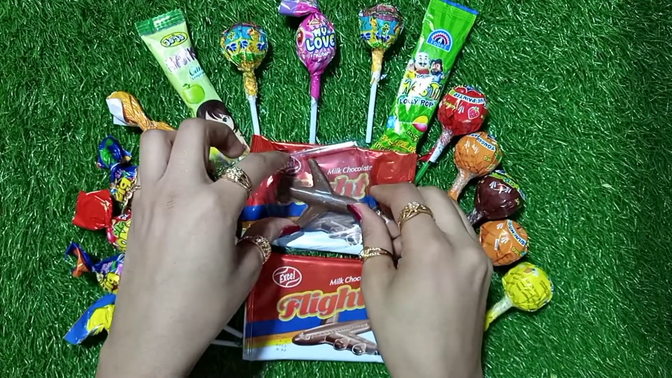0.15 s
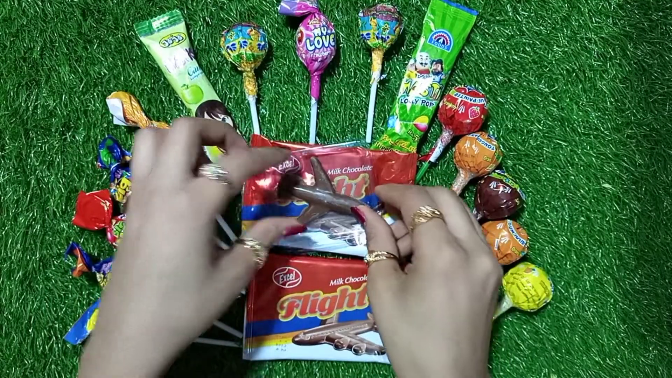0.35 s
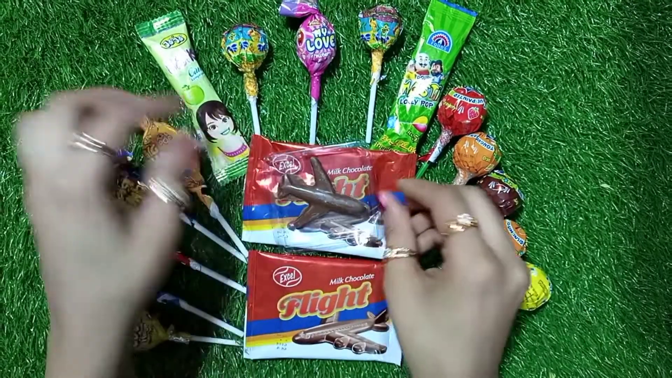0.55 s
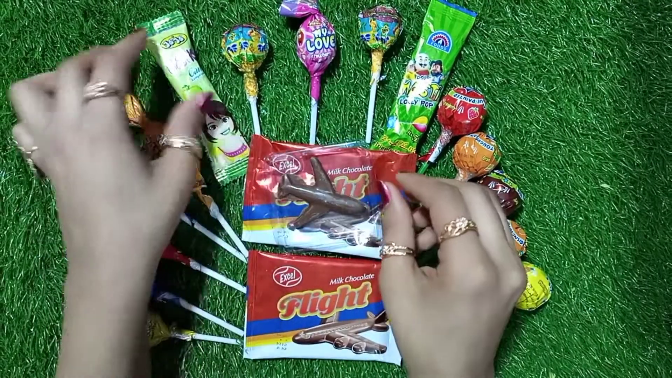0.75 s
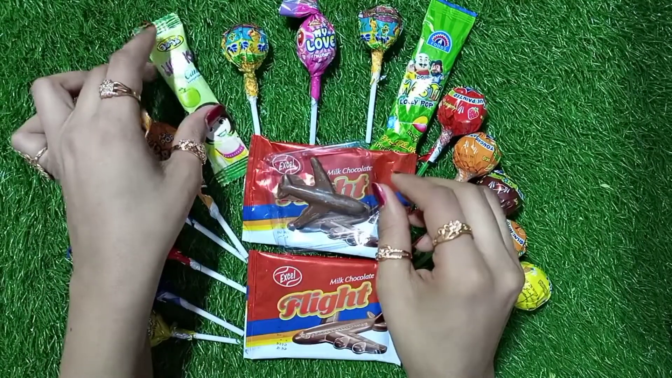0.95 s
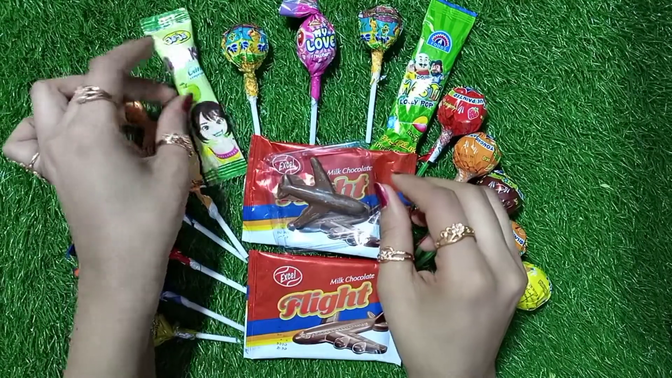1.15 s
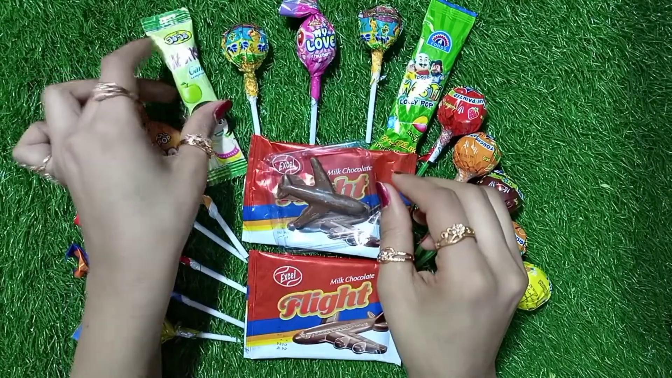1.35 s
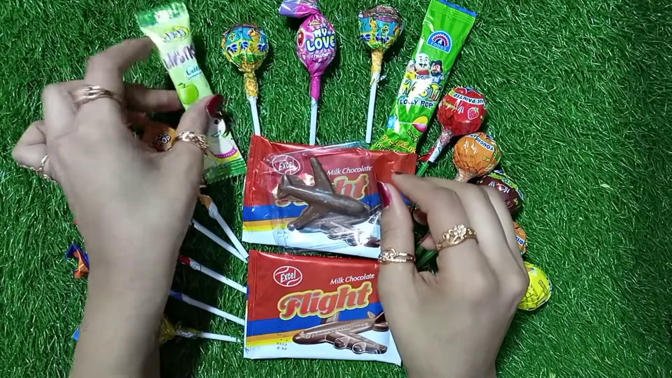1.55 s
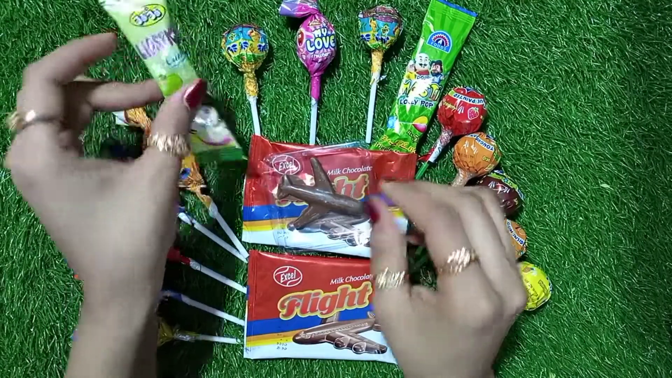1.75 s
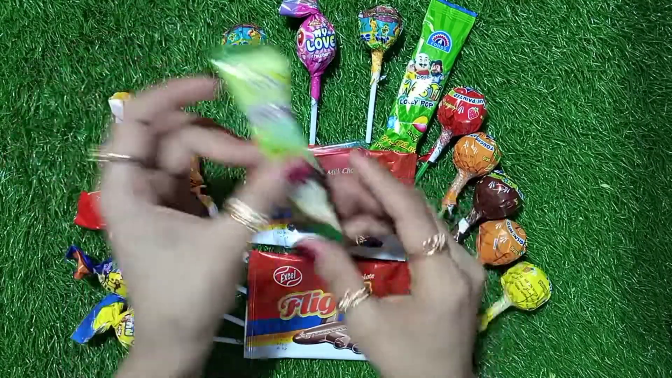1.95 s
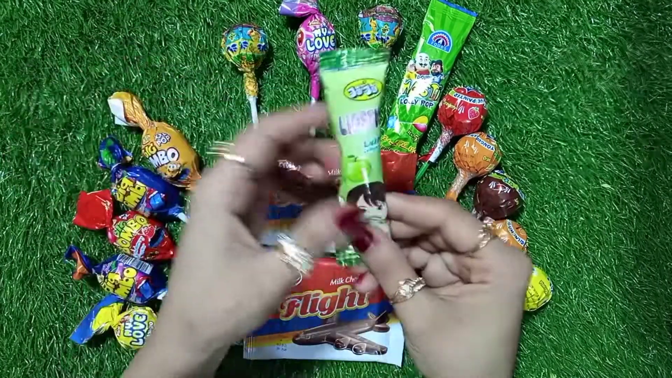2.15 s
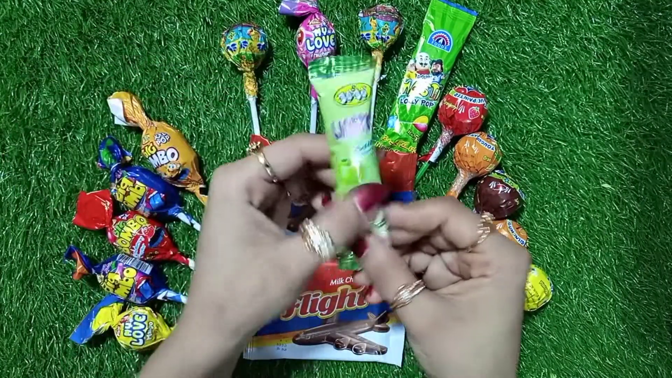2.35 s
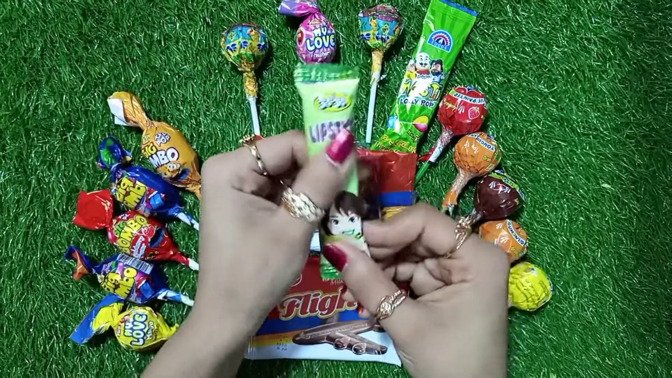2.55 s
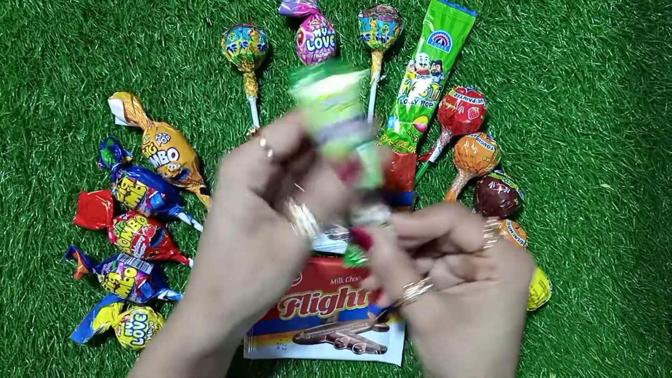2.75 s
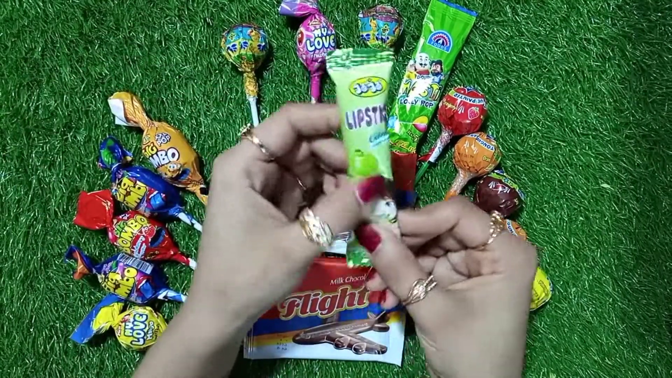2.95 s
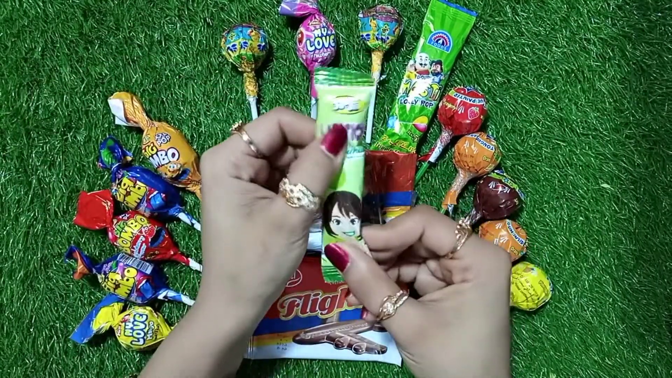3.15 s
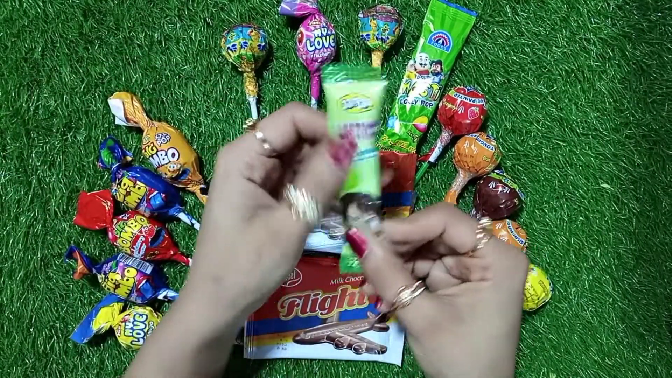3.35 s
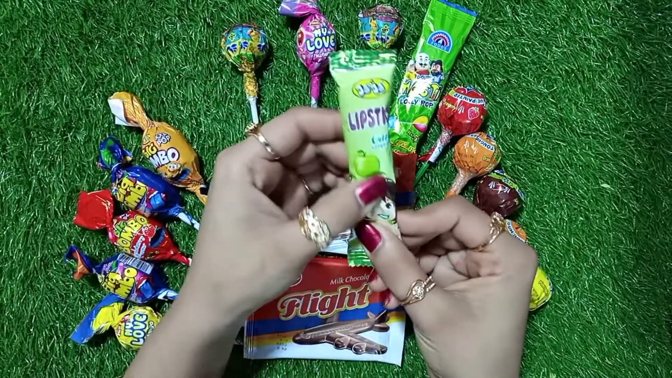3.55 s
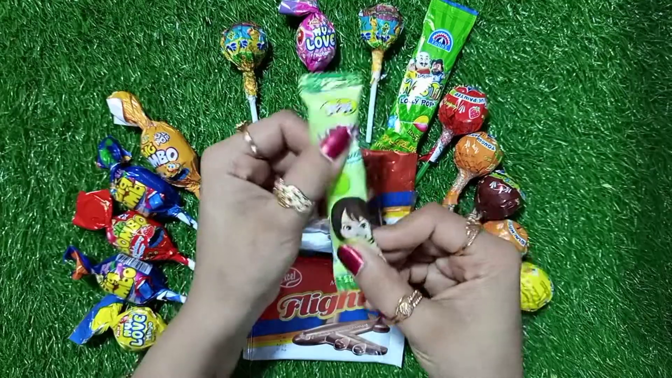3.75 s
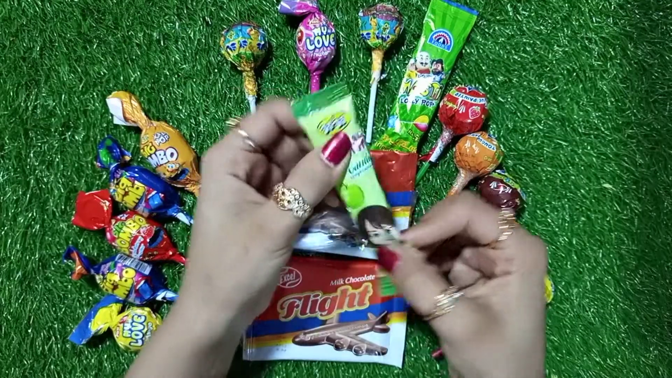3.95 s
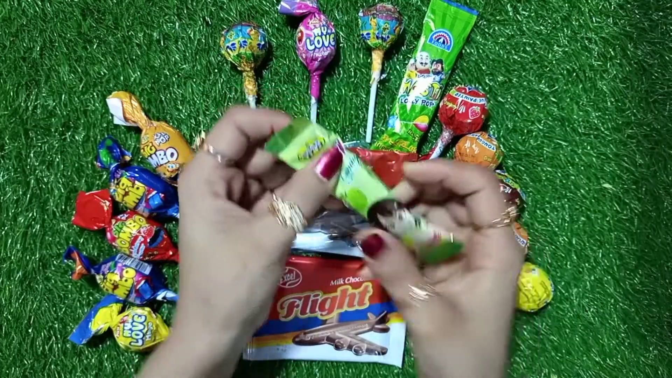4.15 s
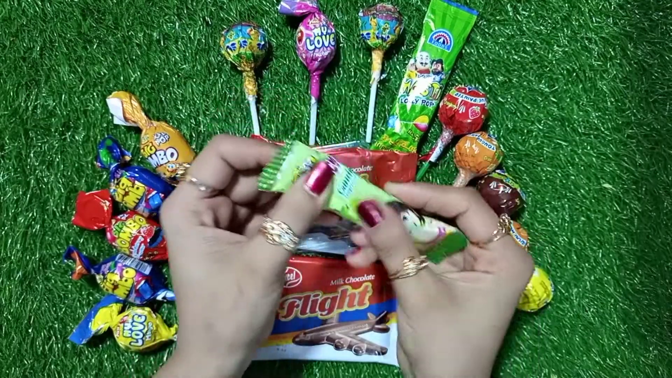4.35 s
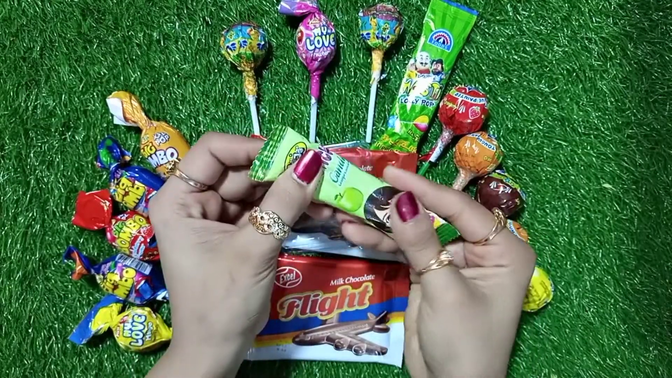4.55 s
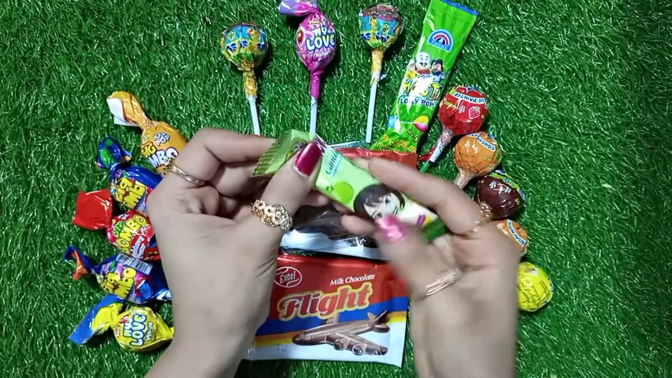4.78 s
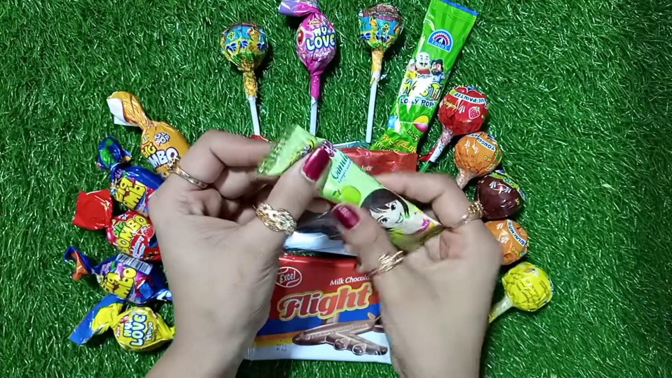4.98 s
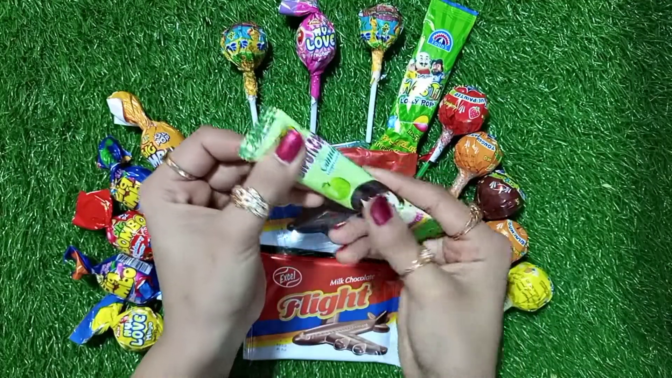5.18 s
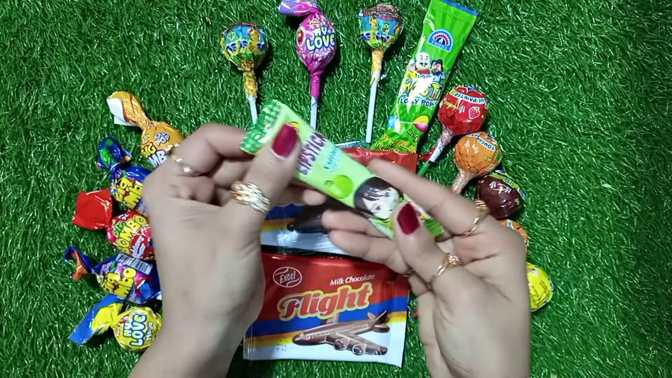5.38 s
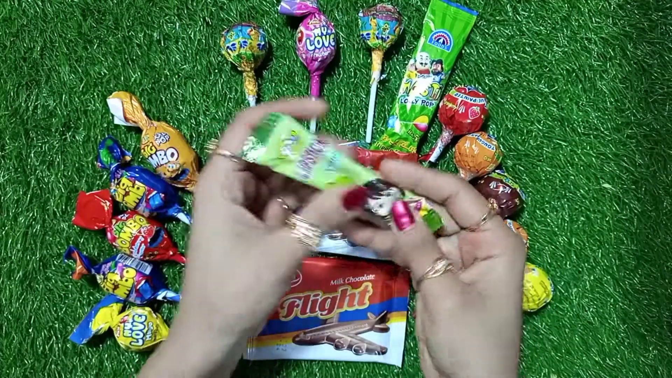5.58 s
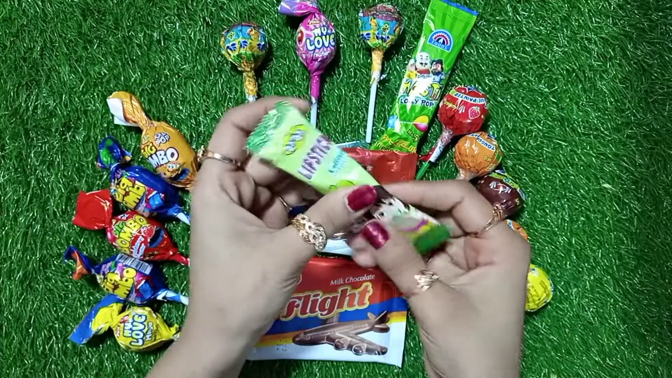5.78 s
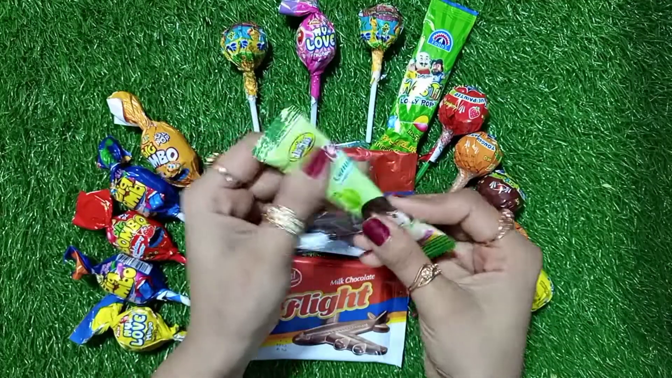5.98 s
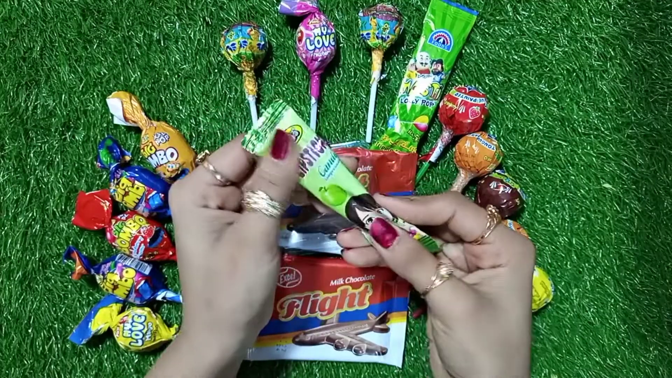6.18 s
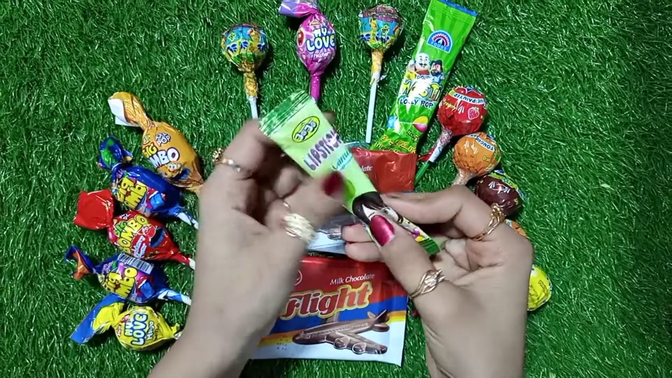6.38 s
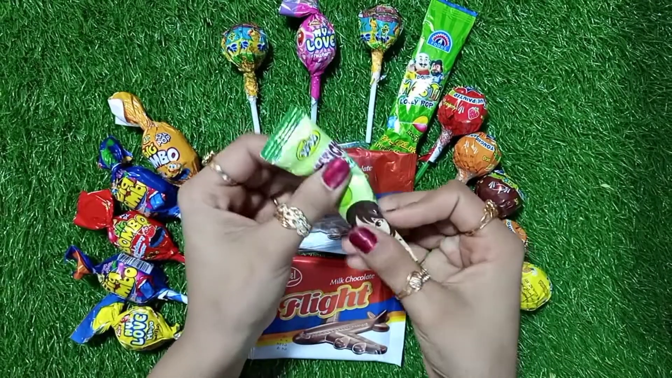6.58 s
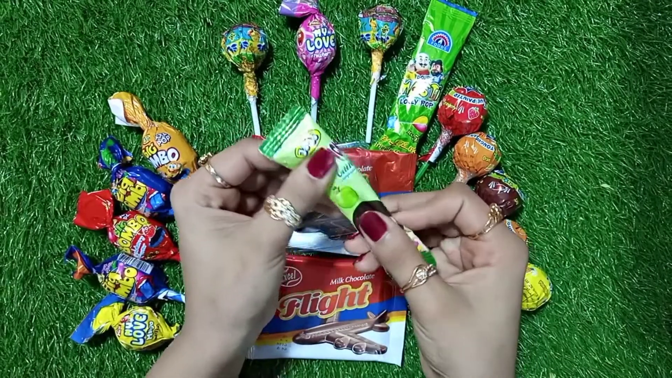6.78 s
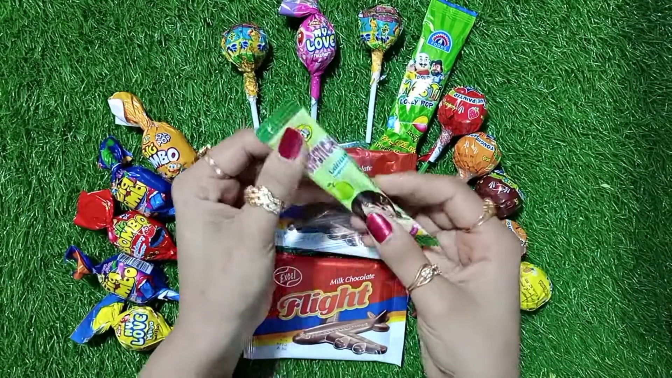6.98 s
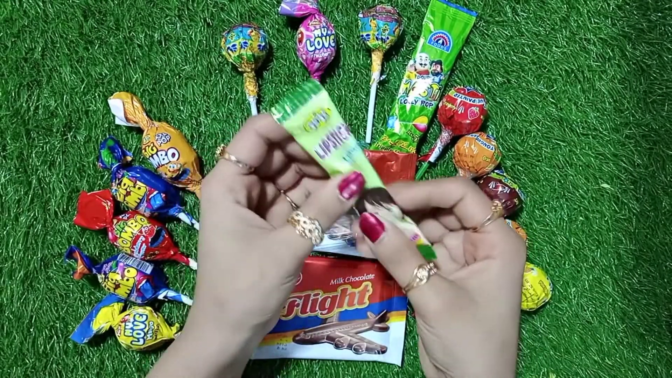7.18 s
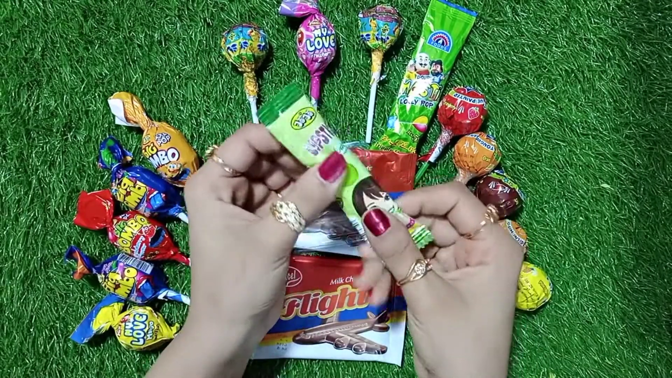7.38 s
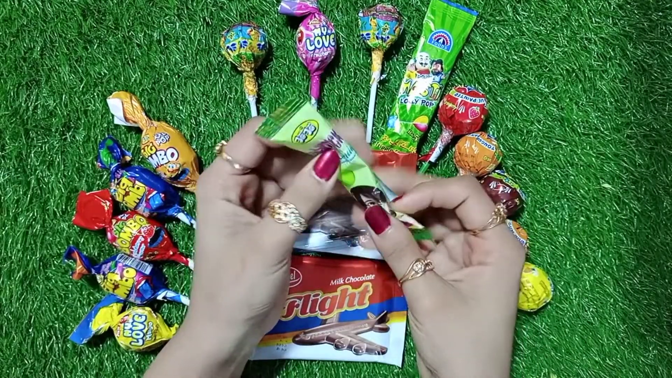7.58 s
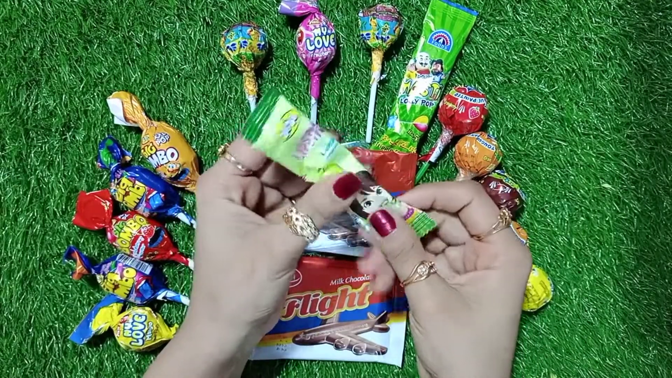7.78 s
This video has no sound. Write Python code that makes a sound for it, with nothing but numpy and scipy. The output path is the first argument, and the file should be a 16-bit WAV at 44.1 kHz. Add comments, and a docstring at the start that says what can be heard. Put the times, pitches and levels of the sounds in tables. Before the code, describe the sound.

Fingers squeeze and twist a small stiff plastic candy sleeve up close, first faintly, then in dense bright crackles and sharp snaps.

```python
"""Two hands work at a sweet in a stiff plastic sleeve, close to the microphone, and a small room answers.
Creases buckle in loud snaps: each flip is a short, dispersed ring at the pitch of its own facet.
Squeezes drive fine crackle from the same rings and a noise rub; the bent film later ticks as it settles.
Hollow flexes and faint squeaks are gliding or rough sines. The table shudders with a low tone and rumble
while the hand reaches over; later something hoots faintly far off, over still air and microphone hiss."""
import sys
import numpy as np
from scipy import signal
from scipy.fft import rfft, irfft, next_fast_len
from scipy.io import wavfile
from scipy.ndimage import uniform_filter1d, map_coordinates

SR = 44100
rng = np.random.default_rng(int(sys.argv[2]) if len(sys.argv) > 2 else 0)


def pcm_store(signal):
    """Save signal as 16-bit PCM."""
    levels = np.round(np.clip(np.atleast_2d(signal), -1, 1) * 32767)
    wavfile.write(sys.argv[1], SR, levels.astype(np.int16).T)


N = 345303

# the loudest creases buckling: start_s, level_db (rms over 4 ms, before the trims in snaps), pitch_hz of the
# facet, body_db of the packet and edge_db of its sharp top (both before the offsets in buckles)
CREASES = [(0.2748, -46, 2170, 8.5, 0), (0.4262, -52.5, 2850, 1, 21.5), (0.914, -50, 3630, 4, -9),
           (1.1306, -44, 2180, -3, -2), (1.143, -44.5, 2220, 5, 3), (1.4855, -42, 3340, 0, -7),
           (1.521, -44.5, 3180, 7, 9.5), (1.6267, -43, 3880, 1, 2), (1.8547, -44.5, 3750, 0, 3),
           (1.972, -47.5, 2960, -46, -12), (2.153, -36.5, 3420, 13, 3), (2.1788, -35.5, 2560, 12.5, 0),
           (2.3143, -36.5, 3070, -6, 1), (2.4426, -30.5, 3430, -1, 2), (2.5647, -33.5, 2740, 4, 7.5),
           (2.6347, -27, 4000, -4, 4.5), (2.6523, -31.5, 2810, -18, -9), (2.8607, -32.5, 3550, 5, -6),
           (2.9466, -34, 3040, 9, -20), (3.0824, -35.5, 2880, 4, -6), (3.1629, -34.5, 3460, 4.5, 4),
           (3.2021, -35, 3930, -13, -2), (3.2303, -32, 2950, -24, -14), (3.3203, -29, 3080, -1, 7.5),
           (3.3328, -26.5, 3900, -16, -8), (3.4387, -27.5, 3300, -2.5, -7), (3.4731, -33, 3100, -3, -30),
           (3.6529, -36.5, 4400, 5.5, 6.5), (3.829, -36.5, 3060, 0, -10), (3.9397, -36, 3320, -14, 1),
           (3.9901, -26, 3670, -2, 3), (4.076, -29.5, 3570, -8.5, 5), (4.208, -38, 3470, -1, 2),
           (4.2577, -33, 3580, -10, -4), (4.311, -33.5, 3430, -5, -25), (4.3884, -30, 3280, -6, 2),
           (4.4413, -30.5, 2480, -11, 3), (4.4668, -29, 4550, -30, 4), (4.5571, -30.5, 2780, -13, 3.5),
           (4.6353, -27.5, 2920, -20, 0), (4.6804, -26.5, 2600, -22, 0.5), (4.856, -34.5, 3200, -12, 8),
           (4.8759, -32, 3100, -3, 0), (5.072, -30, 2470, -7, -19), (5.0894, -28, 2880, -10, 8.5),
           (5.1301, -23.5, 2300, -4, 0.5), (5.1853, -27.5, 2460, -10, -15), (5.2677, -27.5, 2550, -23, -10),
           (5.295, -34, 2880, -17, -8), (5.3236, -29.5, 2260, -23, -12), (5.3456, -30.5, 2650, -24, -7),
           (5.4049, -24.5, 3500, -22, -4.5), (5.4729, -33, 2540, -24, 0.5), (5.4949, -31, 3240, -2, -5),
           (5.524, -27, 3660, -10, 1), (5.5933, -24.5, 3050, 7.5, 1), (5.7512, -31, 3870, -14, -1),
           (5.7905, -27.5, 3860, 7, -4), (5.8199, -27.5, 3060, 3, 0), (5.8929, -30, 3360, -2, -5),
           (5.9936, -28, 2040, -3, -6), (6.0174, -31, 3560, -3, -4), (6.0365, -25.5, 3400, 2, -8),
           (6.0429, -29, 3570, 4.5, 7.5), (6.0958, -35.5, 3290, -22, 3), (6.1053, -31.5, 2470, -25, 2),
           (6.261, -35, 3360, -18, 8), (6.3227, -35.5, 3600, -26, -23), (6.3368, -34.5, 2560, -21, -33),
           (6.6208, -29.5, 3560, 4, -4), (6.6728, -28.0, 3600, -10, -9), (6.7082, -30.0, 4100, -7, -5),
           (6.773, -28, 4200, -5, -5), (6.798, -27, 3360, -12, -33), (6.8323, -24.5, 2900, 9, 3.5),
           (6.9569, -29, 3860, -19, -6), (7.0103, -26, 3150, -4, -9), (7.0383, -34.5, 3230, -6, 6),
           (7.2586, -29.5, 3580, -4, 0), (7.3537, -27.0, 3400, 7, -4), (7.3961, -28, 4030, 3, 0),
           (7.459, -32, 3750, 9, -2), (7.5373, -32, 2800, 8, 1), (7.6495, -31.5, 4200, 2, 3),
           (7.7205, -33, 4100, -2, -2.5), (7.7645, -33.5, 3350, -16, -11), (7.7925, -29, 3770, -23, -6)]
# overall colour of the crinkling, with a narrow bright peak near 15 kHz: frequency_hz, level_db (relative)
CRINKLE_COLOUR = [(100, -50), (350, -35.5), (700, -17.5), (1400, -9), (2400, -2), (3500, -0.5), (6000, -13.5),
                  (8000, -28.5), (13200, -38), (15100, -14), (16200, -42.5)]


def amp(db):
    """Decibels to gain."""
    return 10 ** (np.asarray(db) / 20)


def unit(x):
    """x at rms 1."""
    return x / np.sqrt(np.mean(x ** 2) + 1e-20)


def along(points, hz):
    """(Hz, value) points read on a log axis."""
    f, v = np.transpose(points)
    return np.interp(np.log(hz + 1), np.log(f + 1), v)


def filtered(x, response):
    """x times a response of frequency."""
    m = next_fast_len(N + SR // 2)
    hz = np.fft.rfftfreq(m, 1 / SR)
    return irfft(rfft(x, m) * response(hz), m)[:N]


def noise(spectrum):
    """Coloured noise of rms 1."""
    white = rng.standard_normal(N)
    return unit(filtered(white, lambda hz: amp(along(spectrum, hz))))


def wobble(rate):
    """A smooth random curve, rate knots a second."""
    knots = rng.standard_normal(int(N * rate / SR) + 4)
    return map_coordinates(knots, [np.arange(N) * rate / SR])


def arch(s, length):
    """A gain that swells from s and fades within length seconds."""
    progress = np.clip((np.arange(N) / SR - s) / length, 0, 1)
    return np.abs(np.sin(np.pi * progress))


def tone(hz):
    """A sine of rms 1 that follows a pitch curve."""
    return np.sqrt(2) * np.sin(2 * np.pi * np.cumsum(hz) / SR)


def scattered(count):
    """Random times in seconds, one in each of count equal slots."""
    slot = rng.random(count)
    return (np.arange(count) + slot) * N / SR / count


def air():
    """The still room and the microphone's hiss: steady coloured noise."""
    # colour of the hiss: frequency_hz, level_db (relative)
    air_colour = [(30, -7), (120, -1), (600, -3), (3200, -13), (8000, -23), (13500, -32), (15200, -13)]
    return amp(-83) * noise(air_colour)


def hoots():
    """Soft, low, far-off notes whose pitch and level waver."""
    # each hoot: start_s, length_s
    hoot_times = [(5.147, 0.24), (5.58, 0.077), (5.758, 0.16), (6.123, 0.23), (6.62, 0.2), (7.177, 0.24),
                  (7.624, 0.14)]
    swell = sum(np.sqrt(arch(s, length)) for s, length in hoot_times)
    level_db = 4.0 * wobble(30) - 74.5
    pitch_hz = 234 + 13 * wobble(60)
    return swell * amp(level_db) * tone(pitch_hz)


def table():
    """The table top judders at its lowest mode; each shove adds a shorter, dull rumble."""
    # surges of the table: near_middle_s, mode_db, rumble_db (tone and noise rms at the top of each swell)
    surges = [(0.611, -58, -60), (.78, -64, -58.5), (.93, -57.5, -61), (1.08, -57, -71), (1.2, -67, -60.5),
              (1.32, -63, -59.5), (1.48, -70, -79)]
    # colour of the rumble: frequency_hz, level_db (relative)
    rumble_colour = [(40, -32), (85, 5), (130, 1), (330, -8.5), (450, -29), (900, -57)]
    swing = sum(amp(db) * arch(s - .07, 0.17) for s, db, _ in surges)
    shove = sum(amp(db) * arch(s - .08, 0.16) ** 1.23 for s, _, db in surges)
    mode_hz = 89 + 4 * wobble(30)
    return swing * tone(mode_hz) + shove * noise(rumble_colour)


def squeaks():
    """Surfaces of table and film stick and slip: brief faint tones of gliding, slightly unsteady pitch."""
    # each squeak: start_s, length_s, start_hz, end_hz, level_db (tone rms at the top of the swell)
    squeak_glides = [(0.0, 0.12, 592, 640, -81), (0.873, 0.35, 357, 449, -77),
                     (1.86, 0.091, 4550, 4480, -73)]
    t = np.arange(N) / SR
    waver = 1 + 0.01 * wobble(120)
    total = np.zeros(N)
    for s, length, start_hz, end_hz, db in squeak_glides:
        glide_hz = np.interp(t, [s, s + length], [start_hz, end_hz])
        total += amp(db) * arch(s, length) * tone(waver * glide_hz)
    return total


def flexes():
    """The whole packet flexes under a finger: its air pocket gives a short, hollow, rough crumple."""
    # each flex: near_middle_s, level_db (tone rms at the top of the swell), pitch_hz (centre of the roughness)
    packet_flexes = [(2.153, -59, 522), (2.317, -52.5, 700), (2.859, -59.5, 418), (3.084, -54, 730),
                     (3.532, -59, 730), (4.13, -62.5, 371), (5.597, -65, 761), (6.045, -58, 400),
                     (6.622, -65.5, 520), (7.354, -58.5, 380)]
    rough = np.exp(0.21 * wobble(350))
    return sum(amp(db) * arch(s - .014, 0.036) ** 2 * tone(hz * rough) for s, db, hz in packet_flexes)


def grip(s):
    """Crackle dB and body dB at the times s: each squeeze closes, holds and relaxes; the strongest rules."""
    # squeezes of the fingers: full_grip_s, held_s, effort_db (at full grip, before tremor), body_db of the packet
    squeezes = [(0.002, 0.0058, -58.5, -9), (0.266, 0.014, -58.5, 11.5), (1.065, .01, -65.5, -2),
                (1.134, 0.014, -53.5, 9.5), (1.295, 0.018, -79, 9), (1.465, 0.053, -58, 3),
                (1.636, 0.051, -64.5, -3), (1.828, 0.017, -60, -11), (2.107, 0.073, -46, 0.5),
                (2.32, 0.062, -54.5, 5), (2.447, 0.058, -45, 4.5), (2.558, 0.1, -43.5, -6),
                (2.805, 0.031, -36, -2), (2.94, 0.038, -47, 3), (3.085, 0.015, -46, 3),
                (3.175, 0.019, -43, -8.5), (3.329, 0.078, -42.5, -2.5), (3.44, 0.13, -49, 3.5),
                (3.705, 0.042, -51.5, -1), (3.773, 0.076, -45.5, 0.5), (3.968, 0.044, -40.5, -1.5),
                (4.085, 0.05, -43, 7), (4.26, 0.41, -49, -0.5), (4.52, 0.34, -43.5, -20),
                (4.82, 0.037, -37.5, -10.5), (5.068, 0.075, -34.5, -2), (5.182, 0.026, -36.5, -9),
                (5.35, 0.054, -38.5, -1), (5.49, 0.28, -42.5, -1.5), (5.7, .19, -40.5, -0.5),
                (5.983, 0.08, -35.5, -2), (6.1, 0.032, -43.5, -2.5), (6.264, 0.092, -43.5, -10),
                (6.508, 0.12, -48.5, -1), (6.63, 0.057, -37.5, -6.5), (6.74, 0.11, -46.5, 1.5),
                (6.928, 0.082, -42.5, -10), (7.088, 0.01, -39, 5), (7.228, 0.13, -43.5, 3),
                (7.353, 0.062, -33, -0.5), (7.448, 0.18, -35.5, -2.5), (7.755, 0.081, -39.5, 0)]
    close_db_per_s, relax_db_per_s = 823, 289
    rest_db = -83.5  # fingers merely resting on the film
    start, held, db, body = np.transpose(squeezes)
    since = s[:, None] - start
    closing_db = close_db_per_s * np.maximum(-since, 0)
    relaxing_db = relax_db_per_s * np.maximum(since - held, 0)
    each_db = db - closing_db - relaxing_db
    return np.maximum(each_db.max(axis=1), rest_db), body[each_db.argmax(axis=1)]


def effort(count=2000):
    """How hard the fingers work the film, in dB for every sample; the grip is never quite even."""
    tremor_db = 1.5 * wobble(25)
    s = np.linspace(0, N / SR, count)
    return np.interp(np.arange(N) / SR, s, grip(s)[0]) + tremor_db


def rub(effort_db):
    """Fingertips slide on the film with a soft, uneven rustle."""
    rustle = unit(filtered(noise(CRINKLE_COLOUR), lambda hz: 1 / (1 + (hz / 7000) ** 2)))
    catch_db = 3 * wobble(90)
    return amp(effort_db - 18.0 + catch_db) * rustle


def buckles(s, db, pitch, body, edge, facet_db, octaves, ripple_db, size=1024):
    """Each crease gives, flips and rings for a few cycles at the pitch of its own facet."""
    hz = np.fft.rfftfreq(size, 1 / SR) + 1
    chance = rng.standard_normal((len(s), len(hz)))
    facet = 1 / (1 + (np.log2(hz / pitch[:, None]) / octaves) ** 2)
    # the hollow of the packet resonates low, at a pitch that changes with every flip
    hollow_hz = 760 * np.exp(0.097 * chance[:, :1])
    low = np.exp(-.5 * (np.log2(hz / hollow_hz) / 0.77) ** 2)
    high = 1 / (1 + (6800 / hz) ** 8)
    # waves crossing the crumpled sheet give every flip its own uneven colour
    ripple = unit(uniform_filter1d(chance, size=5, axis=1))
    colour_db = along(CRINKLE_COLOUR, hz) + facet_db * (facet - 1) + ripple_db * ripple
    colour_db += (body[:, None] + 3) * low + (edge[:, None] + 2) * high
    # nearly minimum phase: the crease swells for a cycle, and most of the ring follows the flip
    sudden = .55  # 0 is symmetric in time, 1 is minimum phase
    fold = 1 + sudden * np.sign(np.fft.fftfreq(size))
    cepstrum = irfft(np.log(amp(colour_db)), axis=1) * fold
    # bending waves are dispersive: the low notes of a flip arrive a little after the high ones
    dispersion = np.exp(-2j * np.pi * 0.74 * np.sqrt(hz / pitch[:, None]))
    spectrum = np.exp(rfft(cepstrum, axis=1)) * dispersion
    rings = np.fft.fftshift(irfft(spectrum, axis=1), axes=1)
    span = .004 * SR  # samples over which the level counts
    rings *= (amp(db) * np.sqrt(span) / np.linalg.norm(rings, axis=1))[:, None]
    where = np.round(s * SR).astype(int)[:, None] + np.arange(size) - size // 2
    return np.bincount(np.abs(where).ravel(), rings.ravel(), N)[:N]


def settling(effort_db, count=170):
    """The bent film creeps back in sparse single ticks that follow the pressure with a lag."""
    lag_s, below_effort_db = 0.134, -8.5
    s = scattered(count)
    size, detune, depth, sharp = rng.standard_normal((4, count))
    bent_db = np.interp(s - lag_s, np.arange(N) / SR, effort_db)
    db = bent_db + below_effort_db + 3.4 * size
    pitch = 3200 * np.exp(0.2 * detune)
    return buckles(s, db, pitch, 5 * depth - 6, 6 * sharp - 3, facet_db=11.5, octaves=0.2, ripple_db=4.5)


def crackle(effort_db, count=1150):
    """Small creases flip at random, each tipping a neighbour; their colour follows the big snaps' grip."""
    light_db = -73  # below this the touch is too light to crease the film sharply
    s = scattered(count)
    size, lag = rng.random((2, count))
    detune, depth, sharp, step = rng.standard_normal((4, count))
    snap_s, _, snap_hz, _, snap_edge = np.transpose(CREASES)
    push_db = effort_db[(s * SR).astype(int)]
    # a light touch mostly rubs: its creases are fainter and dull
    idle_db = np.maximum(light_db - push_db, 0)
    db = push_db - 0.099 * idle_db - 11.5 + 16 * size ** 1.19
    pitch = np.interp(s, snap_s, snap_hz) * np.exp(0.22 * detune)
    body = grip(s)[1] + 2.6 * depth
    edge = 5.7 * sharp - 4 + 0.24 * np.interp(s, snap_s, snap_edge) - 0.64 * idle_db
    neighbour = (s + .003 * lag, pitch * np.exp(0.07 * step))
    return sum(buckles(times, db, hz, body, edge, facet_db=10.5, octaves=0.14, ripple_db=3.5)
               for times, hz in ((s, pitch), neighbour))


def snaps(count=3):
    """A big crease gives way in a stutter of flips, a millisecond or so after the first."""
    s, db, pitch, body, edge = np.transpose(CREASES)
    film = buckles(s, db - 3.0, pitch, body, edge, facet_db=11, octaves=0.21, ripple_db=2.5)
    for _ in range(count):
        lag, size, detune = rng.standard_normal((len(s), 3)).T
        later_s = s + 0.001 * np.exp(.7 * lag)
        later_db = db - 10.5 + 2 * size
        later_hz = pitch * np.exp(0.16 * detune)
        film += buckles(later_s, later_db, later_hz, body, edge, facet_db=9.5, octaves=0.12, ripple_db=3.5)
    return film


def room(x, t60, early_db, tail_db, early_t60):
    """Near surfaces answer within milliseconds, then the walls die away, duller than the film."""
    t = np.arange(SR // 2) / SR
    wet = np.zeros(N + SR)
    hop = SR // 4
    for start in range(0, N, hop):  # the moving hands keep changing the paths
        near, far = rng.standard_normal((2, len(t)))
        near = unit(near * amp(-60 * t / early_t60) * (t > .002))
        far = unit(far * amp(-60 * t / t60) * (t > .008))
        response = (amp(early_db) * near + amp(tail_db) * far) / np.sqrt(len(t))
        echo = signal.fftconvolve(x[start:start + hop], response)
        wet[start:start + len(echo)] += echo
    return filtered(wet[:N], lambda hz: 1 / (1 + (hz / 12000) ** 2))


def scene():
    """The wrapper in its room, over the quiet background."""
    effort_db = effort()
    wrapper = snaps() + crackle(effort_db) + settling(effort_db) + rub(effort_db) + flexes() + squeaks()
    echo = room(wrapper, t60=0.39, early_db=-13.5, tail_db=-16.5, early_t60=0.012)
    return (wrapper + echo + table() + hoots() + air())[None]


def record(dry):
    """The recorder keeps nothing above its band limit."""
    top_hz = 16500
    return filtered(dry[0], lambda hz: hz < top_hz)[None]


dry = scene()
out = record(dry)
pcm_store(out)
```